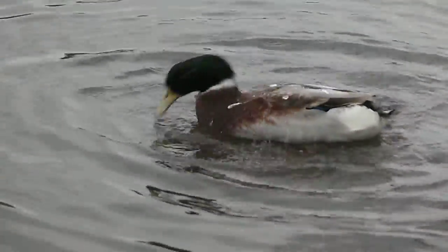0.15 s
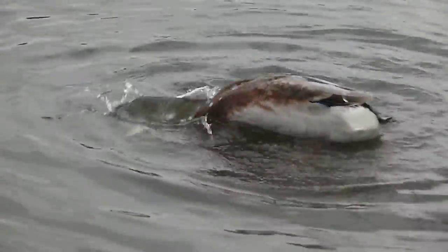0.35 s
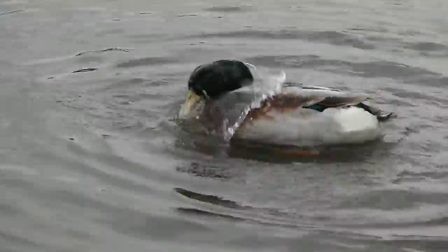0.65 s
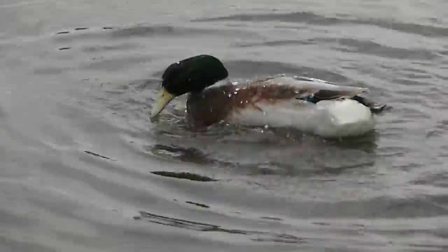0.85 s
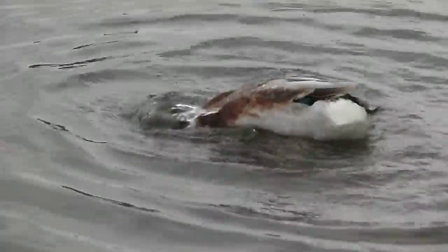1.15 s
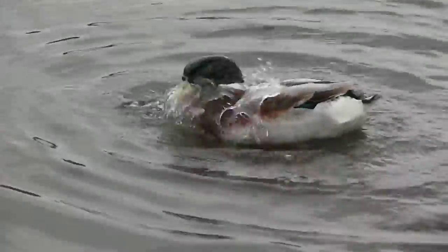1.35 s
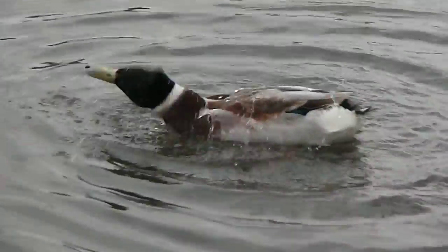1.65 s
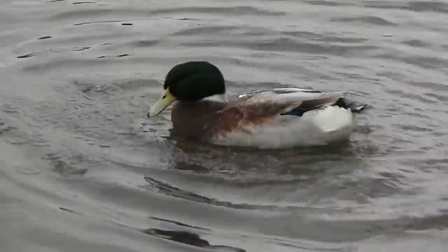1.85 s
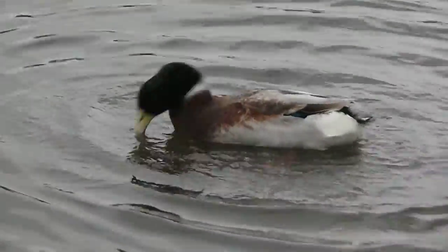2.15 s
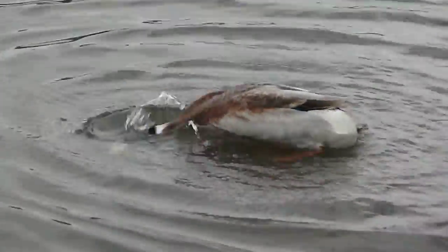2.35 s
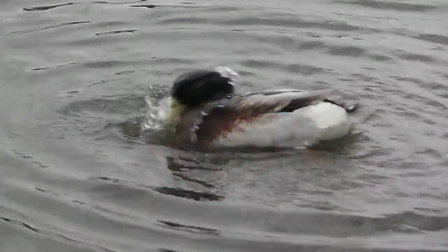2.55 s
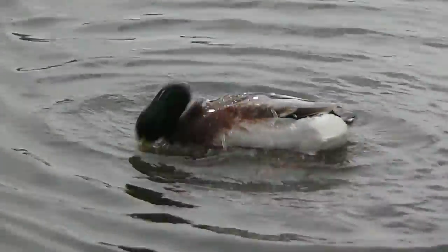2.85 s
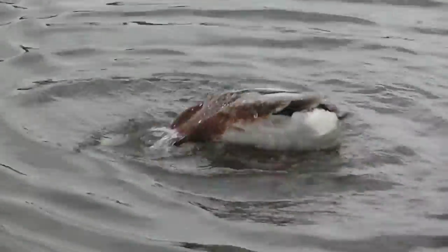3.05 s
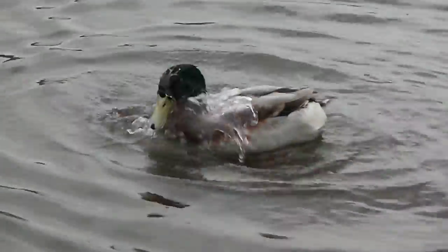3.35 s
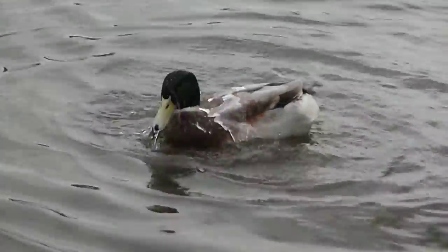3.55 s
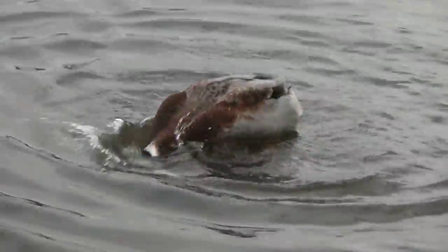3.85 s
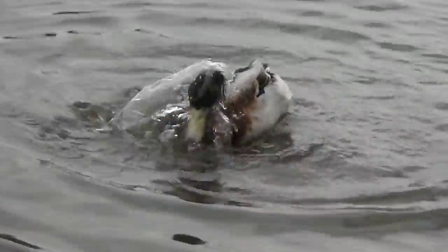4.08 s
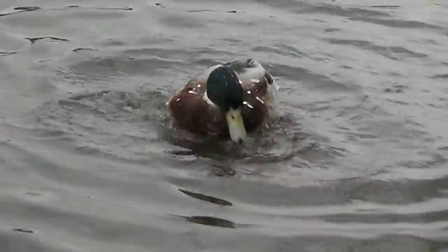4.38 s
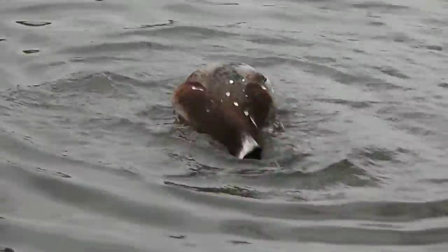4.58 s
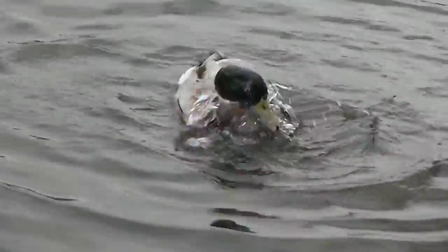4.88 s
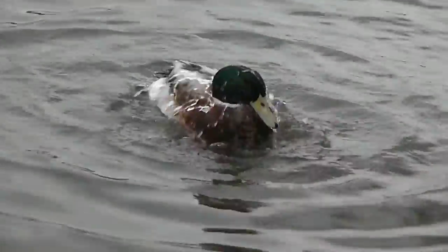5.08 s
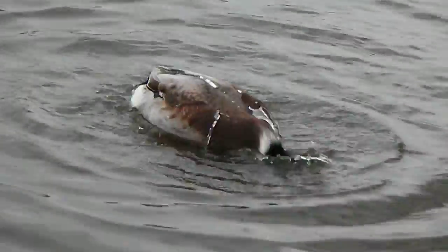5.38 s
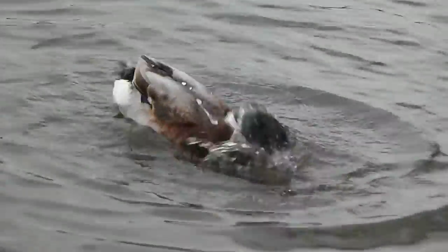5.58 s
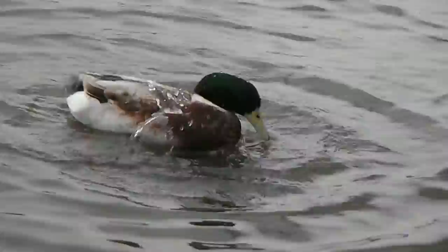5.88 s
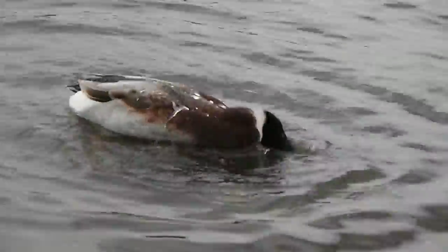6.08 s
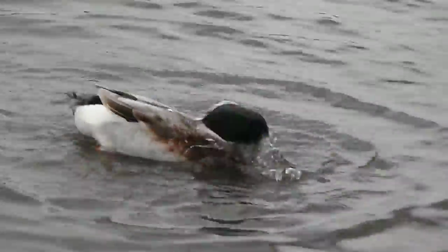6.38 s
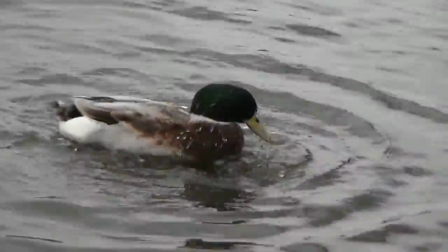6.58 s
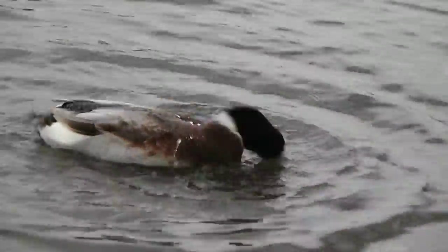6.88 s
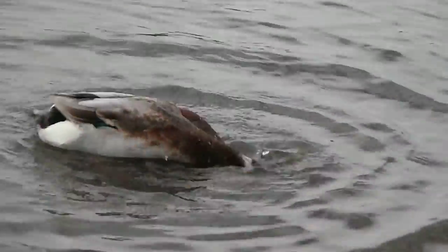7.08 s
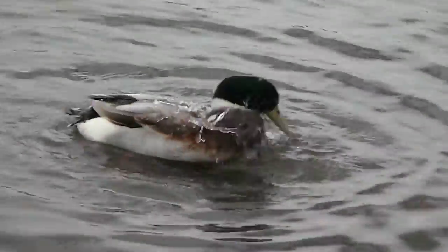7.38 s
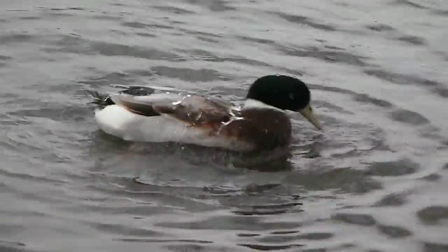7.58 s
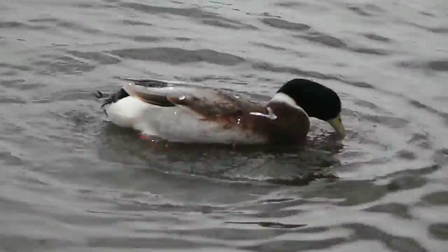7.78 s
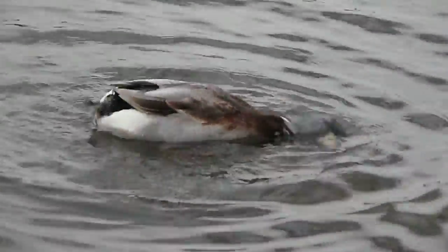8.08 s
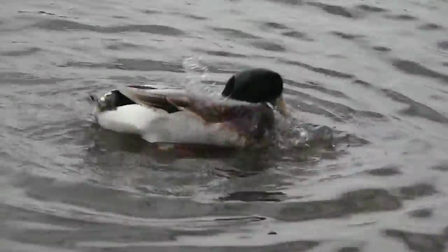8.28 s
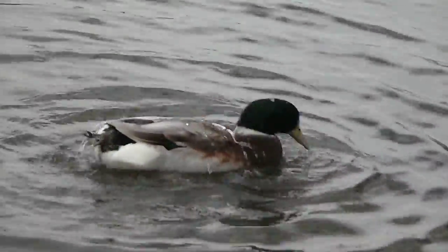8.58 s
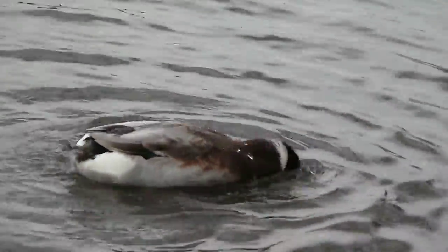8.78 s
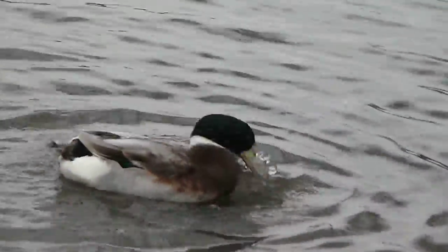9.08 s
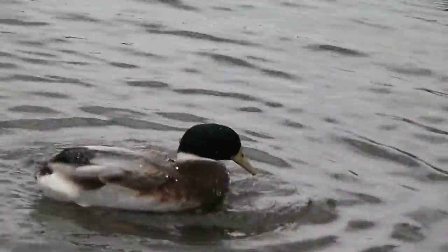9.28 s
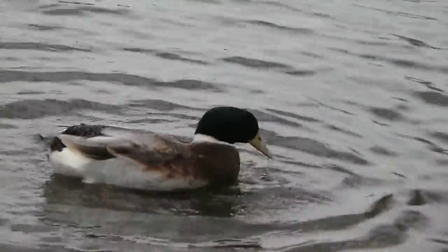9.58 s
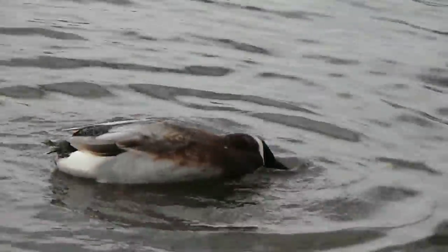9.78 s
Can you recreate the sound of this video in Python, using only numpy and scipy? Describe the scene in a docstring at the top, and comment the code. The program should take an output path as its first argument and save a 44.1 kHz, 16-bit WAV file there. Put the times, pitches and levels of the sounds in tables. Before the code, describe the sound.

A duck bathes with bubbly splashes and scattered drips while a gull-like bird cries harshly about once a second over soft outdoor air.

```python
"""A duck's bath with a crying gull

A mallard bathes near a lake shore: a rain of tiny ringing bubbles and noise ticks makes spray, slosh and drops.
Close by a water bird, probably a gull, cries: each burst of air slaps harshly, then eases into a whistle.
Some cries sink into a growl of two voices at once; thin whines and short voice cracks are near-pure tones.
Behind them lies the soft, even rush of the open air, which is coloured noise."""
import sys
import numpy as np
from scipy import signal
from scipy.fft import rfft, irfft, next_fast_len
from scipy.io import wavfile
from scipy.ndimage import uniform_filter1d

SR = 44100
rng = np.random.default_rng(int(sys.argv[2]) if len(sys.argv) > 2 else 0)


def to_wav(sig):
    """Store sig (one row per channel, or 1-D mono) as 16-bit WAV at the path in sys.argv[1].

    Samples outside -1..1 are clipped; the rate is SR.
    """
    pcm = np.clip(np.atleast_2d(sig), -1, 1) * 32767
    pcm = np.round(pcm).astype(np.int16)
    wavfile.write(sys.argv[1], SR, pcm.T)  # frames by channels


N = 438354
TIME = np.arange(N) / SR
CUTOFF_HZ = 15900   # top of the sound

# The balance of pitches in the fine spray: f/Hz, relative level/dB
SPRAY_COLOUR = [(1000, 2), (2000, 3), (3200, 9.5), (4500, 3), (7500, 4), (11000, -1.5), (15000, -41)]
# The balance of pitches in the slosh: f/Hz, relative level/dB
SLOSH_COLOUR = [(200, -5.5), (400, -10), (800, -3), (1400, -3), (2600, -9)]
# The duck dips its head and throws water over its back:
# t/s, pouring time/s, spray level/dB, slosh level/dB (both before the trims in bathing)
DIPS = [(0, 0.1, -66, -65), (.33, 0.47, -61, -65), (1.28, 0.31, -61, -65.5), (2.42, 0.38, -58.5, -60),
        (3.12, 0.46, -60.5, -61), (3.96, 0.34, -60.5, -66.5), (4.8, 0.3, -61, -58), (5.58, 0.22, -60, -57),
        (6.36, .12, -65, -59), (7.2, 0.36, -64.5, -62), (8.2, 0.2, -65, -71), (9, .15, -69.5, -65),
        (9.78, 0.19, -78, -65)]


def bathing(spray_trim_db=3.0, patter_trim_db=-2.0, slosh_trim_db=-0.5, ticks_per_s=700):
    """Fine spray ticks and tinkles on the lake over the bubbling slosh around the body."""
    _, _, throws_db, pushes_db = np.transpose(DIPS)
    spray_level = stirred(throws_db, rise_s=0.12, sag_db_per_s=4, decay_db_per_s=59.5, calm_db=-77)
    slosh_level = stirred(pushes_db, rise_s=0.14, sag_db_per_s=4, decay_db_per_s=35, calm_db=-74)
    spray = grains(spray_level + spray_trim_db, per_s=700, spectrum=SPRAY_COLOUR, cycles=22, spread_db=1.5)
    slosh = grains(slosh_level + slosh_trim_db, per_s=500, spectrum=SLOSH_COLOUR, cycles=7.3, spread_db=2.0)
    # the patter: single-sample ticks of random strength
    ticks = (rng.random(N) < ticks_per_s / SR) * rng.standard_normal(N)
    ticks = ticks * from_db(5.5 * wander(TIME, 150))
    patter = rms_one(cut(colour(ticks, SPRAY_COLOUR), 900, "high")) * from_db(spray_level + patter_trim_db)
    return spray + patter + slosh + cut(drops(spray_level), 110, "high")


def stirred(levels_db, rise_s, sag_db_per_s, decay_db_per_s, calm_db):
    """Level of the water in dB: each dip builds up, thins out while it pours, then dies away."""
    power = from_db(calm_db) ** 2   # the calm between dips
    for (start, pour_s, *_), db in zip(DIPS, levels_db):
        age = TIME - start
        build_up = 10 * np.minimum(age / rise_s, 0)   # 10 dB per rise time, ahead of the start
        sag = sag_db_per_s * np.clip(age, 0, pour_s)
        decay = decay_db_per_s * np.maximum(age - pour_s, 0)
        power = power + from_db(db + build_up - sag - decay) ** 2
    return 10 * np.log10(power)


def grains(level_db, per_s, spectrum, cycles, spread_db):
    """A random rain of bubbles; livelier water makes both more and stronger ones."""
    out, drive = np.zeros(N), from_db(level_db - np.max(level_db))
    born = np.flatnonzero(rng.random(N) < per_s * drive / SR)
    low_hz, high_hz = spectrum[0][0], spectrum[-1][0] * 0.867
    for at, (pitch, size, length) in zip(born, rng.random((len(born), 3))):
        hz = low_hz + (high_hz - low_hz) * pitch ** 1.5
        strength = from_db(-spread_db * np.log(size + 0.038))   # a few are much stronger than the rest
        strength = strength * gain_at(spectrum, hz) * np.sqrt(drive[at]) * hz ** 0.81
        add(out, at / SR, strength * bubble(hz, cycles * (1.15 + length) / hz, rise=0.19))
    return rms_one(out) * np.sqrt(np.mean(from_db(level_db) ** 2))


def bubble(hz, t60, rise):
    """A trapped bubble rings and goes up in pitch as it nears the surface; t60 is its 60 dB fade in s."""
    t = np.arange(int(t60 * SR) + 2) / SR
    ring = np.sin(2 * np.pi * hz * t * (1 + rise * t / t60))
    return ring * from_db(-60 * t / t60) * (1 - np.exp(-2 * hz * t))


# The balance of pitches in the crack of a drop: f/Hz, relative level/dB
CRACK_COLOUR = [(1000, 5), (3200, -3), (5000, 2), (8000, 2), (11000, -5.5), (15000, -12)]
# The biggest drops that hit the lake: t/s, level/dB (bubbles under 3000 Hz end up weaker),
# starting f/Hz of the bubble, level/dB of the crack against the second column (before its trim)
DROPS = [(0.584, -32.5, 3500, -28), (0.664, -42, 5400, 0), (0.69, -35.5, 2800, -6.5),
         (0.773, -41.5, 3100, -1), (0.802, -41, 5500, -5), (1.05, -40.5, 3700, -5),
         (1.1672, -35.5, 6560, -9.5), (1.5513, -33, 6325, -11), (1.6135, -34.5, 1500, -10),
         (1.759, -36.5, 4300, -23), (2.1982, -34, 4653, -6.5), (2.2955, -38.5, 3380, 1),
         (2.394, -32, 3246, -13), (2.487, -35.5, 3280, -6.5), (2.531, -41, 3900, -1),
         (2.5815, -34.5, 1250, -2.5), (2.6777, -38.5, 3400, -0.5), (2.779, -36.5, 3260, -1),
         (2.8187, -37, 2800, -2.5), (2.8786, -32, 3220, -7), (2.983, -35.5, 4800, -9),
         (2.835, -39, 11800, -16), (3.1178, -34, 5000, -9), (3.1515, -41, 5540, -3),
         (3.1755, -33.5, 6500, -10), (3.279, -40, 9800, -14), (3.353, -37, 7400, -10),
         (4.0223, -39.5, 1250, -0.5), (4.207, -36.5, 7800, -2), (4.3345, -35, 9500, -30),
         (4.769, -30.5, 8400, -28), (4.837, -36, 5340, -6.5), (4.9186, -32, 793, -5.5),
         (4.989, -37.5, 4500, -7), (5.0838, -45, 1862, 4), (5.116, -38, 7340, -6), (5.621, -34, 1743, 1),
         (5.6408, -34, 1449, 0), (5.845, -38, 13000, -12), (6.044, -40.5, 8800, -4),
         (6.405, -38, 1590, -4.5), (6.52, -39, 5000, -8), (6.972, -43.5, 3764, -0.5),
         (7.2605, -37, 8300, -7), (7.457, -39, 7594, -5), (8.988, -34.5, 7783, -10.5)]
# The biggest air pockets that the duck drags under:
# t/s, level/dB (before the trim), starting f/Hz, time to fade by 60 dB/s
PLOPS = [(0.805, -51, 745, 0.068), (1.276, -41.5, 1210, 0.049), (1.615, -40.5, 1420, 0.051),
         (2.294, -44, 1070, 0.024), (2.579, -45, 1209, .03), (2.842, -45, 1170, 0.031),
         (2.879, -44, 790, .03), (2.983, -42, 1110, 0.022), (3.1, -45, 790, 0.042), (3.135, -45, 1430, .05),
         (3.224, -45, 1290, 0.041), (4.748, -42.5, 1660, 0.065), (4.917, -39.5, 766, 0.081),
         (4.97, -49, 790, 0.088), (5.08, -56, 870.5, 0.1), (5.295, -45.5, 690, 0.069),
         (5.705, -42.5, 227, 0.038), (5.706, -37.5, 1324, 0.052), (5.706, -34, 348, 0.016),
         (6.392, -46.5, 686.5, 0.066), (8.174, -36, 1830, 0.025), (9.749, -47, 812, 0.042)]


def drops(spray_level, splat_trim_db=-1.0, ring_trim_db=0.0, cycles=32, plop_trim_db=-0.5):
    """A drop snaps and cracks on the surface and leaves a small bubble; air pockets gulp, mostly lower."""
    out, t = np.zeros(N), np.arange(1500) / SR
    for start, db, hz, crack_db in list(DROPS) + small_drops(spray_level):
        fade = from_db(-60 * t / 0.018) + .07 * from_db(-60 * t / .04)   # a quick fade and a faint slower one
        crack = cut(rng.standard_normal(len(t)) * fade, 780, "high")
        snap = cut(from_db(14) * (t == 0), 4200, "high")   # the first contact: one bright click
        add(out, start, from_db(db + crack_db + splat_trim_db) * colour(crack + snap, CRACK_COLOUR))
        ring = min(hz / 3000, 1) * bubble(hz, cycles / hz, rise=0.064)
        add(out, start + 0.00045, from_db(db + ring_trim_db) * ring)
    for start, db, hz, t60 in PLOPS:
        add(out, start, from_db(db + plop_trim_db) * bubble(hz, t60, rise=0.167))
    return out


def small_drops(spray_level, per_s=8, low_hz=1500, high_hz=7000, crowding=1.2):
    """Lesser drops fall at random, crowding into heavy spray: rows like those of the big drops."""
    # per_s holds in the heaviest spray
    rate = per_s * from_db(crowding * (spray_level - spray_level.max()))
    born = np.flatnonzero(rng.random(N) < rate / SR)
    size, pitch = rng.standard_normal(N)[born], rng.random(N)[born]
    hz = low_hz * (high_hz / low_hz) ** pitch
    return [(start, db, f, -1.5) for start, db, f in zip(TIME[born], -43.5 - 0.5 * size, hz)]


# Cries: t/s, length/s, time to the crest/s, time until the rasp tires/s,
# rasp level/dB, whistle level/dB (both before the trims in cry), fade after the crest/dB (negative swells on),
# top f/Hz (before bends), bursts per s at the start, at the end, opening scoop share, pitch dip in a burst share,
# bill resonance f/Hz at the start, at the end, its level/dB, low part level/dB, whistle overtone level/dB,
# hiss share (before it swells early in each burst)
CRIES = [(0.206, 0.31, 0.07, .19, -50, -57, 6, 1606, 72, 70, 0.078, 0.1, 4330, 4600, 8, 2, -5, 2.1),
         (1.242, 0.37, 0.17, .28, -54, -53.5, 7, 1618, 74, 71, 0.089, 0.15, 3940, 4970, -3, 2.5, -3, 3.1),
         (2.318, 0.36, 0.093, .21, -51.5, -55, 7, 1686, 77, 54, 0.047, .15, 4200, 4120, 8, 1, -1, 1.94),
         (3.36, 0.39, 0.16, .25, -52, -51.5, 11.5, 1662, 86, 57, 0.068, .17, 3780, 4260, -10, -8, -3, 1.51),
         (4.382, 0.34, 0.14, .215, -47, -47, 6, 1711, 85, 53, 0.044, 0.18, 7400, 6200, 2, -6, -6.5, 1.8),
         (5.316, 0.12, 0.069, .1, -44, -42, 8, 1600, 84, 81, 0.18, 0.13, 3300, 2800, -2, -3, -2, 2.1),
         (5.401, 0.0776, 0.059, .1, -48.5, -54, -9, 1620, 70, 76, 0.014, 0.05, 4600, 4450, -4, 7, 7, 2.1),
         (7.045, 0.26, 0.09, .183, -40.5, -47.5, 6.5, 1628, 71, 75, 0.15, 0.16, 4300, 5840, 5.5, -5.5, -10, 1),
         (8.044, 0.42, 0.12, .28, -45, -46.5, 7, 1535, 103, 62, 0.078, 0.28, 4000, 5410, 2.5, -1.5, -8.5, 1.2),
         (9.18, 0.32, 0.097, .19, -42.5, -46.5, 5.5, 1578, 95, 58, 0.139, 0.24, 5200, 6200, -0.5, -3, 0.5, 1.15)]
# Growls: t/s, length/s, body level/dB, edge level/dB, lows level/dB, bill resonance level/dB
GROWLS = [(0.369, .43, -59, -61.5, -7, 14), (5.466, 0.85, -49, -50, 3, 2), (9.826, 0.16, -63, -82, -7, -2)]


def gull():
    """A bird's calls: cries with cracks in the voice, growls, and thin unbroken whines."""
    out = np.zeros(N)
    for start, *voice in CRIES:
        add(out, start, cry(*voice))
    out = cracked(out)
    for start, *voice in GROWLS:
        add(out, start, growl(start, *voice))
    return out + whines()


# How throat and bill colour a cry: f/Hz, relative level/dB
CRY_THROAT = [(900, -8), (1450, -0.5), (2100, -3.5), (2900, 0), (3700, 3.5), (4500, -1.5), (5100, -0.5),
              (5800, 3), (6700, -5), (7400, 1), (8200, -8), (9300, -7), (10300, -12), (11500, -12.5),
              (15000, -26)]


def cry(length, crest_s, tires_s, rasp_db, whistle_db, fade_db, top_hz, first_rate, last_rate, scoop, dip,
        bill_from_hz, bill_to_hz, bill_db, low_db, overtone_db, hiss,
        split_hz=1900, upper_hz=2600, rasp_trim_db=3.0, whistle_trim_db=-1.0, bill_q=5.1):
    """Each burst starts as hard, low, uneven slaps and relaxes into a whistle on the octave."""
    t = np.arange(0, length, 1 / SR)
    rasp_level, whistle_level = cry_levels(t, crest_s, tires_s, fade_db)
    rasp_level, whistle_level = rasp_level + rasp_db, whistle_level + whistle_db
    place, (force, detune, purity) = bursts(t, np.linspace(first_rate, last_rate, len(t)), jitter=.03)

    # pitch: the harder the push, the deeper it is dragged down early in the burst
    contour = 1 - scoop * np.exp(-t / 0.075) - 0.0786 * np.exp((t - length) / 0.074)
    push = np.clip(1.5 + (rasp_level - whistle_level) / 15 + 0.248 * force, .15, 1.7)
    early, late = np.clip(1 - place / .48, 0, 1), np.clip((place - .65) / .25, 0, 1)
    hz = top_hz * contour * (1 - push * (dip * early + 0.018 * late ** 2) + .012 * detune)

    # rasp: a burst snaps open and dies away, in shares of its length
    slaps = pulses(hz * (1 + 0.04 * (0.3 + 2 * early) * wander(t, 1500)), place)
    slaps = slaps + hiss * (.65 + .7 * early) * rng.standard_normal(len(t))
    opens, rise, decay = 0.05, 0.27, 0.45
    since = place - opens
    leak = 0.08 * hiss   # some air always gets through
    flow = leak + np.clip(since / rise, 0, 1) * np.exp(-(np.maximum(since - rise, 0) / decay) ** 2.0)
    throat = colour(slaps * flow, CRY_THROAT)
    throat = from_db(low_db) * cut(throat, split_hz, "low", order=4) + cut(throat, upper_hz, "high", order=4)
    # the gape of the bill picks out one more band, which slides and trembles through the cry
    bill_hz = np.geomspace(bill_from_hz, bill_to_hz, len(t)) * (1 + .03 * wander(t, 40))
    rasp = evened(throat + from_db(bill_db) * glide(throat, bill_hz, bill_q)) * from_db(0.9 * force)
    # the louder a cry, the shriller its top
    top = signal.sosfiltfilt(signal.butter(2, 8100, "high", fs=SR, output="sos"), rasp)
    rasp = rasp + top * (from_db(0.5 * (rasp_level + 44)) - 1)

    # whistle: the octave, its own octave and a little of the tone below
    phase = 2 * cycle_phase(hz, place)
    tone = np.sin(phase) + from_db(overtone_db) * np.sin(2 * phase)
    tone = tone + 0.18 * from_db(low_db) * np.sin(phase / 2)
    whistle = evened(tone * hump(place, centre=0.91, width=0.47) * from_db(1.6 * purity))
    return rasp * from_db(rasp_level + rasp_trim_db) + whistle * from_db(whistle_level + whistle_trim_db)


def cry_levels(age, crest_s, tires_s, fade_db):
    """A cry swells to its crest, then fades: levels of rasp and whistle, in dB against the crest."""
    before = np.clip(1 - age / crest_s, 0, 1)
    after = np.clip((age - crest_s) / (age[-1] - crest_s), 0, 1)
    # late in a cry the rasp gives way to the whistle
    tired = np.clip((age - tires_s) / 0.02, 0, 1)
    # the rasp sets in late and stops early; the whistle leads in and trails off
    rasp = gate_db(age, attack_s=0.029, release_s=0.0397, shut_db=-25.5)
    rasp = rasp - 1.5 * before - fade_db * after - 6.5 * tired
    whistle = gate_db(age, attack_s=0.0177, release_s=0.037, shut_db=-9.5)
    whistle = whistle - 5.5 * before - 0.85 * fade_db * after
    return rasp, whistle


# The voice cracks: the cry dips and leaves a bare, higher whistle:
# t/s of the middle, length/s, f/Hz (before a small tremble), level/dB of its main tone
BREAKS = [(.285, 0.017, 3330, -49), (2.426, 0.019, 3400, -46), (2.465, 0.013, 3280, -48),
          (4.532, .018, 3410, -40.5), (7.138, .018, 3330, -40), (7.208, 0.015, 3370, -42),
          (9.34, 0.013, 3220, -48), (9.399, 0.025, 3120, -47.5)]


def cracked(cries):
    """Where the voice cracks, the cry drops by 7.5 dB under a near-pure whistle."""
    gaps, whistles = np.zeros(N), np.zeros(N)
    for middle, length, hz, db in BREAKS:
        t = np.arange(0, length, 1 / SR)
        phase = 2 * np.pi * np.cumsum(hz * (1 + .01 * wander(t, 400))) / SR
        tone = np.sin(phase) + from_db(-10.5) * np.sin(2 * phase)
        tone = np.sqrt(2) * from_db(db) * tone * signal.windows.tukey(len(t), .8)
        add(gaps, middle - length / 2, signal.windows.tukey(len(t), .3))
        add(whistles, middle - length / 2, tone)
    return cries * from_db(-7.5 * gaps) + whistles


# The two sides of the bird's voice box in a growl: t/s, low voice f/Hz, high voice f/Hz (both before they
# bend in a burst), low voice level/dB, high voice level/dB, bill resonance f/Hz, bursts per s,
# start of the chirp as a share of the burst, sheen level/dB
GROWL_PITCH = [(.42, 1084, 2130, -3, 0, 5050, 82, 0.23, -20), (.58, 998, 2040, -5, 0, 4900, 80, 0.27, -20),
               (.66, 928, 1900, -5, -6, 4000, 80, 0.18, -20), (.78, 867, 1750, -6, -7, 3900, 87, .2, -20),
               (5.48, 1540, 2270, -9, 6, 4000, 79, 0.2, -20),
               (5.55, 1400, 2220, -6.5, 2, 3870, 76, 0.25, -20),
               (5.66, 1305, 1967, -2, 0, 4100, 82, .28, -20), (5.78, 1087, 2074, 0, 0, 4300, 92, 0.25, -15),
               (5.94, 961, 1957, -1, -3, 4660, 88, .22, -4), (6.03, 902, 1920, 0, -13, 4600, 83, .2, 4),
               (6.14, 850, 1827, 7, -7, 4410, 79, .12, 6), (6.23, 790, 1656, -7, -11, 4160, 77, 0.179, 6),
               (6.3, 700.5, 1360, -6, 0, 3950, 77.4, 0.086, 3),
               (9.82, 1500, 2120, -6, 0, 4000, 69, 0.24, -20),
               (9.94, 1400, 1940, 1, -4, 4046, 70, 0.25, -20)]
# How throat and bill colour a growl: f/Hz, relative level/dB
GROWL_THROAT = [(600, -10), (900, 0), (1300, 6.5), (1900, 8.5), (2250, 0.5), (2450, -0.5), (2680, 2.5),
                (3150, -4), (4050, -1), (4450, -6), (4800, 1.5), (5200, 1), (5800, 7.5), (6200, -4.5),
                (6800, -6.5), (8000, -17), (10000, -26), (11300, -19.5), (12400, -20), (14000, -24)]


def growl(start, length, body_db, edge_db, lows_db, bill_db, lows_hz=1500, bill_q=21.0):
    """A high voice sounds beside a low one that chirps upward in every burst of air."""
    t = np.arange(0, length, 1 / SR)
    # a hard push at the start; the bright edge comes in later than the body and leaves before it
    body_level = gate_db(t, attack_s=.01, release_s=.07, shut_db=-12) + 9 * np.exp(-t / 0.011)
    edge_level = body_level - 5.5 * np.exp(-t / 0.11) - 12 * np.exp((t - length) / 0.041)
    low_hz, high_hz, low_db, high_db, bill_hz, per_s, chirp_from, sheen_db = follow(GROWL_PITCH, start + t)
    place, (force, low_detune, high_detune) = bursts(t, per_s, jitter=.022)

    detune, tremor = .018, .009   # pitch spread from burst to burst, and fast shaking
    chirp = np.clip((place - chirp_from) / 0.537, 0, 1)
    chirp = np.sin(np.pi / 2 * chirp ** 1.88) ** 2
    low_bend = 1 + 0.555 * chirp + detune * low_detune + tremor * wander(t, 900)
    low = pulses(low_hz * low_bend, place)
    # the high voice gives way as each burst opens
    high_dip = 0.1015 * np.cos(np.pi * (place - .1)) ** 4
    high_bend = 1 - high_dip + detune * high_detune + tremor * wander(t, 900)
    high = pulses(high_hz * high_bend, place)

    flow = hump(place, centre=0.5, width=0.3)
    source = (low * from_db(low_db) + 0.2 * rng.standard_normal(len(t))) * flow
    source = source + high * from_db(high_db) * (0.33 + 0.31 * flow)
    voice = colour(source * from_db(0.4 * force), GROWL_THROAT)
    voice = colour(voice, [(.8 * lows_hz, lows_db), (1.2 * lows_hz, 0)])
    bill = from_db(bill_db) * glide(voice, bill_hz, bill_q)
    sheen = from_db(sheen_db) * cut(voice, (10700, 11900), "band")   # a thin upper resonance
    voice = voice + bill + sheen
    body = evened(cut(voice, 3250, "low", order=4))
    edge = evened(cut(voice, 4100, "high", order=4))
    return body * from_db(body_level + body_db) + edge * from_db(edge_level + edge_db)


# Thin whines: t/s of the start, t/s of the end, f/Hz (before a small tremble),
# level/dB of the tone an octave above
WHINES = [(5.213, 5.333, 1738, -61.5), (5.296, 5.366, 1750, -50), (7.324, 7.519, 1754, -66)]


def whines():
    """Thin unbroken tones: a weak low tone and its stronger octave, trembling slightly."""
    out = np.zeros(N)
    for start, end, hz, db in WHINES:
        t = np.arange(start, end, 1 / SR)
        phase = 2 * np.pi * np.cumsum(hz * (1 + 0.014 * wander(t, 390))) / SR
        tone = from_db(-8) * np.sin(phase) + np.sin(2 * phase)
        add(out, start, from_db(db) * signal.windows.tukey(len(t), .6) * np.sqrt(2) * tone)
    return out


def bursts(t, per_s, jitter):
    """The airflow breaks into bursts: place within the burst (0-1), and three chance values per burst."""
    count, place = np.divmod(np.cumsum(per_s * (1 + jitter * wander(t, 70))) / SR, 1)
    return place, rng.standard_normal((128, 3))[count.astype(int) % 128].T


def pulses(hz, place):
    """Membranes slapping shut: up to 16 equally strong harmonics, faded out just below the cutoff."""
    phase = cycle_phase(hz, place)
    return sum(np.cos(k * phase) * np.clip((CUTOFF_HZ - k * hz) / 1000, 0, 1) for k in range(1, 17))


def cycle_phase(hz, place):
    """Phase of the membranes, which start afresh with each burst."""
    turns = np.cumsum(hz) / SR
    new_burst = np.diff(place, prepend=1) < 0
    return 2 * np.pi * (turns - np.maximum.accumulate(turns * new_burst))


def hump(place, centre, width):
    """A flat-topped swell within a burst, closed at both ends."""
    swell = np.exp(-.5 * np.abs((place - centre) / width) ** 4)
    return swell * np.sqrt(np.abs(np.sin(np.pi * place)))


def gate_db(age, attack_s, release_s, shut_db):
    """Level of a voice that opens, stays open and shuts again; short calls shut faster."""
    release_s = min(release_s, .2 * age[-1])
    shut = np.maximum(1 - age / attack_s, 1 - (age[-1] - age) / release_s)
    return shut_db * np.clip(shut, 0, 1)


def evened(x):
    """Hold the level at 1 over a few bursts; soft ends."""
    power = uniform_filter1d(x ** 2, size=1800)
    return x / np.sqrt(np.abs(power) + 1e-12) * signal.windows.tukey(len(x), .04)


def glide(x, hz, q):
    """A resonance whose centre moves, stepped in short blocks."""
    out, state = np.zeros(len(x)), np.zeros(2)
    for i in range(0, len(x), 128):
        block = slice(i, i + 128)
        out[block], state = signal.lfilter(*signal.iirpeak(hz[i], q, fs=SR), x[block], zi=state)
    return out


def shore(x, echo_db=-16, t60=0.072):
    """The sound plus weak, dull scatter from the bank: a short tail of fading noise."""
    t = np.arange(SR // 2) / SR
    tail = cut(rng.standard_normal(len(t)), 6500, "low") * from_db(-60 * t / t60) * (t > .004)
    return x + from_db(echo_db) * signal.fftconvolve(x, tail / np.linalg.norm(tail))[:N]


# The balance of pitches in the open air: f/Hz, relative level/dB per Hz
AIR = [(15, -82), (25, -32), (96, -12), (228, -8.5), (269, -5.5), (299, -4.5), (461, -2.5), (572, -1.5),
       (791, -0.5), (1090, -2), (1550, -3.5), (1870, -5), (3990, -11), (8270, -13), (15800, -17.5)]


def open_air(level_db=-57.5):
    """The soft, even rush of the open air: steady noise, weaker toward the highs."""
    return from_db(level_db) * rms_one(colour(rng.standard_normal(N), AIR))


def from_db(db):
    """Decibels to gain."""
    return 10 ** (np.asarray(db) / 20)


def rms_one(x):
    """Scale to an rms (average strength) of 1."""
    return x / np.sqrt(np.mean(x ** 2) + 1e-20)


def follow(rows, t):
    """The columns of a curve, read at times t."""
    s, *columns = np.transpose(rows)
    return [np.interp(t, s, c) for c in columns]


def gain_at(spectrum, hz):
    """Gain of a (f/Hz, level/dB) spectrum at the given frequencies."""
    points, db = np.transpose(spectrum)
    return from_db(np.interp(np.log(np.maximum(hz, 1)), np.log(points), db))


def colour(x, spectrum):
    """Filter with the given spectrum that acts without ringing ahead (minimum phase)."""
    size = 2 * next_fast_len(len(x) // 2 + 1024)
    cepstrum = irfft(np.log(gain_at(spectrum, np.fft.rfftfreq(size, 1 / SR))))
    # folding the second half onto the first puts the response after the sound
    cepstrum[1:size // 2] *= 2
    cepstrum[size // 2 + 1:] = 0
    return irfft(rfft(x, size) * np.exp(rfft(cepstrum)))[:len(x)]


def cut(x, hz, kind, order=2):
    """Butterworth filter."""
    return signal.sosfilt(signal.butter(order, hz, kind, fs=SR, output="sos"), x)


def wander(t, rate):
    """Random values of spread 1, so many a second, joined by straight lines."""
    steps = (t - t[0]) * rate
    count = int(steps[-1]) + 2
    return np.interp(steps, np.arange(count), rng.standard_normal(count))


def add(out, s, sound):
    """Mix a sound in at time s."""
    at = max(int(s * SR), 0)
    out[at:at + len(sound)] += sound[:max(N - at, 0)]


def scene(lag_s=.000022, diffuse_db=-9, scatter_db=-17):
    """Everything lies a little to the right; the air and the scatter from the bank are partly diffuse."""
    air, diffuse = open_air(), from_db(diffuse_db) * open_air()
    near = cut(gull(), 550, "high") + bathing()
    right = shore(near) + air
    # the left ear hears it slightly later
    left = irfft(rfft(right) * np.exp(-2j * np.pi * np.fft.rfftfreq(N, 1 / SR) * lag_s), N)
    scatter = shore(near, echo_db=scatter_db, t60=0.06) - near
    side = diffuse + scatter
    return np.array([left, right]) + side * np.array([[1], [-1]])


# How much the two channels differ: f/Hz, level/dB of the side signal
STEREO_WIDTH = [(300, -64), (700, -27), (1400, -46), (2200, -14.5), (3200, -3.5), (5000, -0.5)]


def record(dry):
    """Closely spaced microphones: nearly mono in the lows, with a steep cut at the top."""
    hz = np.fft.rfftfreq(N, 1 / SR)
    mid, side = rfft(dry[0] + dry[1]) / 2, rfft(dry[0] - dry[1]) / 2
    side = side * gain_at(STEREO_WIDTH, hz)
    top = 1 / np.sqrt(1 + (hz / CUTOFF_HZ) ** 300)
    return irfft(np.array([mid + side, mid - side]) * top, N)


dry = scene()
out = record(dry)
to_wav(out)
```